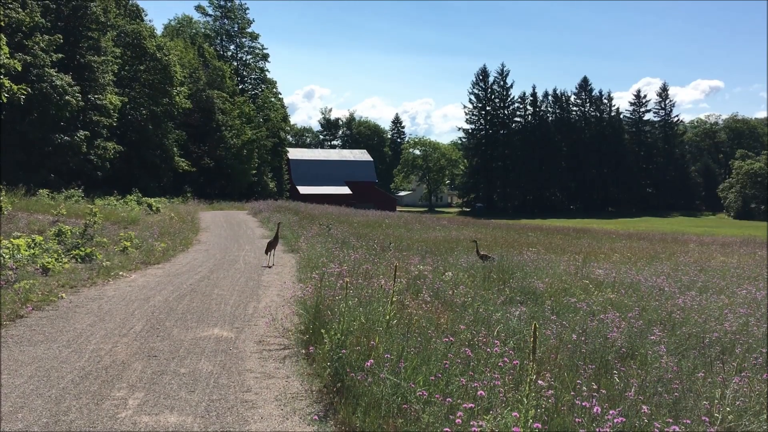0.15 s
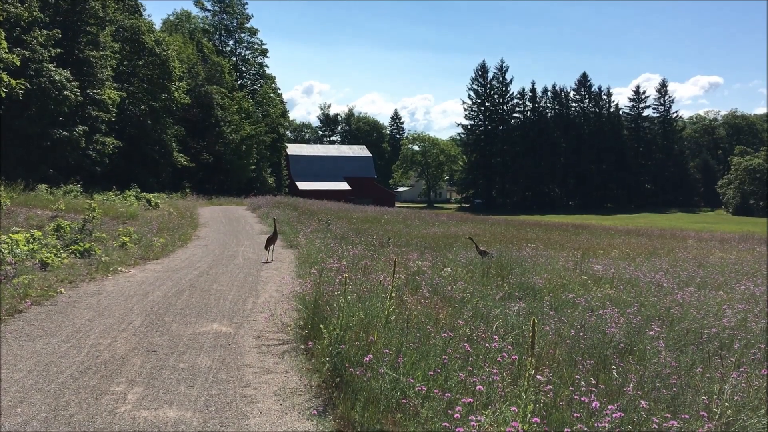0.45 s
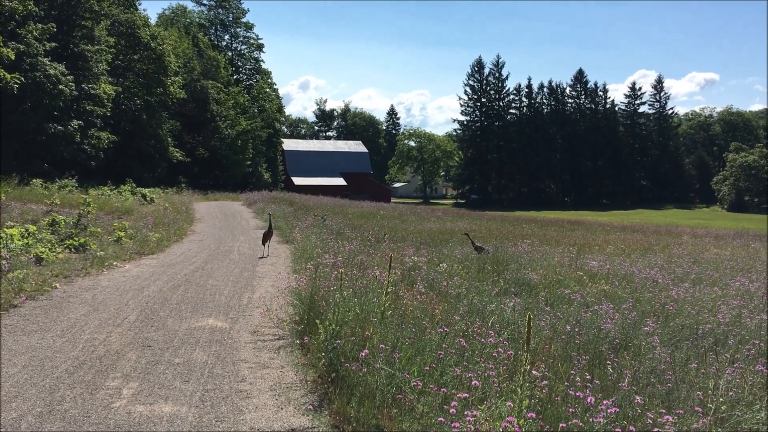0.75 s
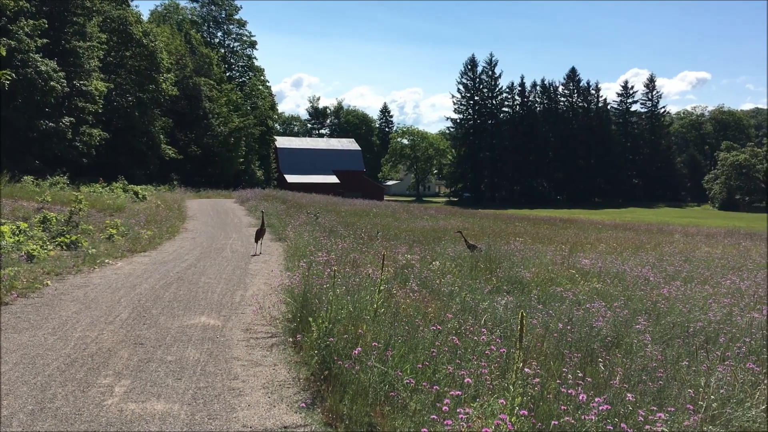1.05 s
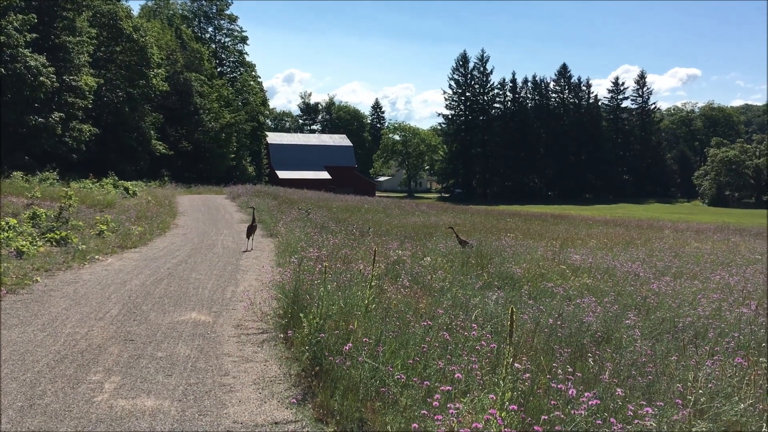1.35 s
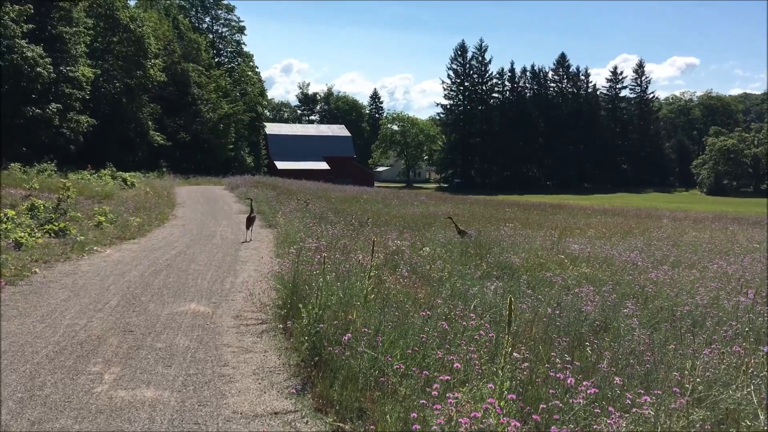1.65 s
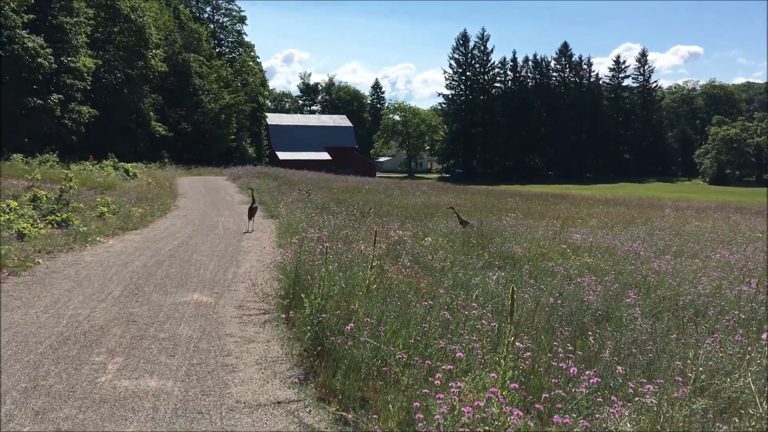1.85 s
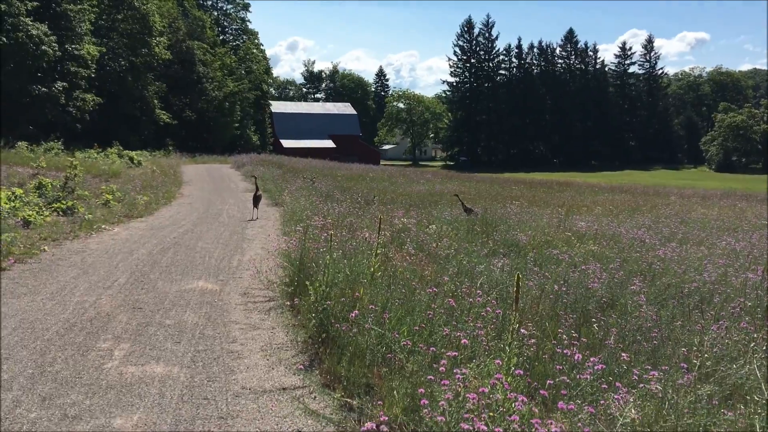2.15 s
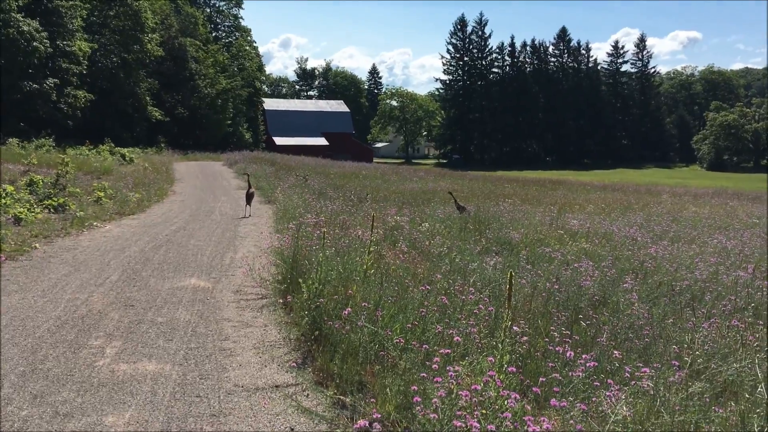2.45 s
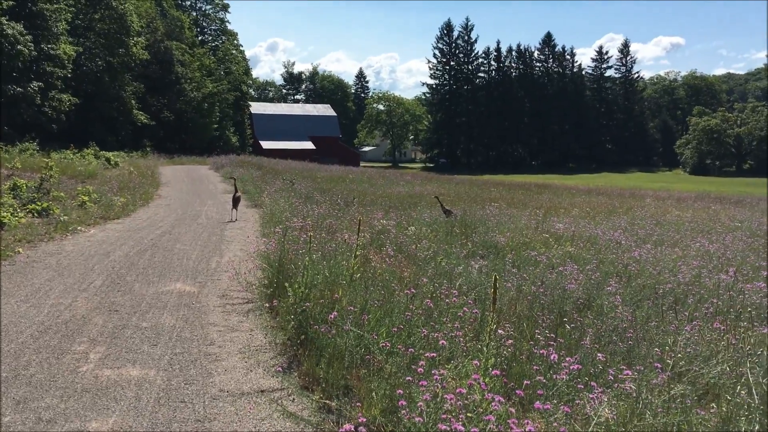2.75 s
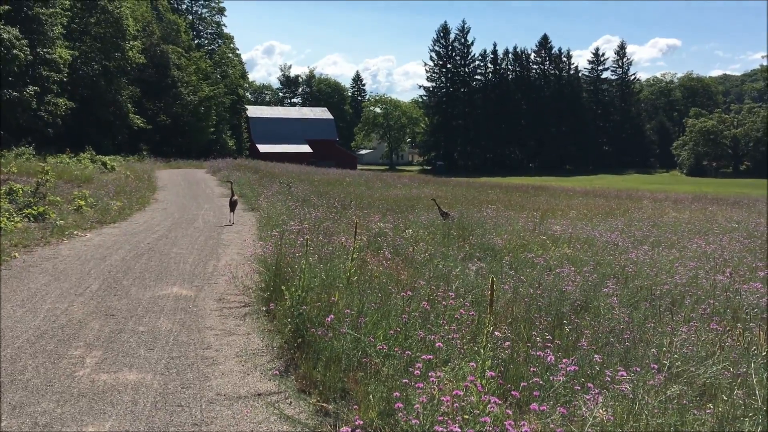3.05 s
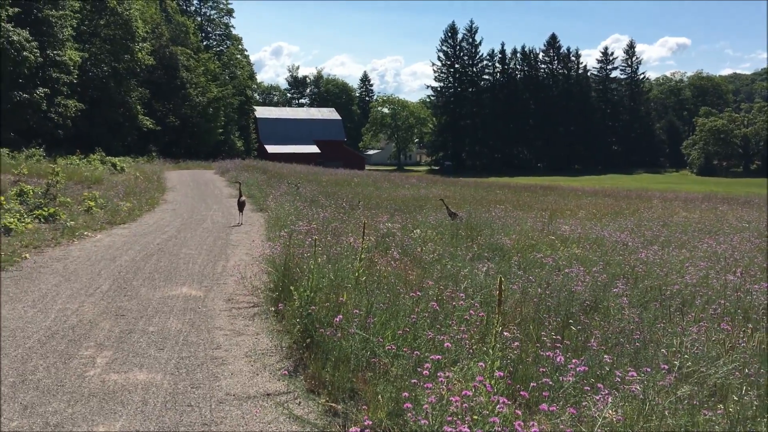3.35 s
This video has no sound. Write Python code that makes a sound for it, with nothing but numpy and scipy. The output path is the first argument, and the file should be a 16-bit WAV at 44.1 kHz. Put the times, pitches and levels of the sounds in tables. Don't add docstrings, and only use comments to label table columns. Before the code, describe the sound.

Loud crane rattles outdoors: each bird gives a short rising croak then a hard, throaty, ringing trill, low bird first, high bird overlapping in answer, repeated once, over wind rumble and faint leaf hiss, mono.

```python
import sys
import numpy as np
from scipy import signal
from scipy.fft import rfft, irfft
from scipy.io import wavfile
from scipy.ndimage import uniform_filter1d

SR = 44100
rng = np.random.default_rng(int(sys.argv[2]) if len(sys.argv) > 2 else 0)


def generate_wav(signal):
    frames = np.transpose(np.atleast_2d(signal))
    scaled = np.clip(frames, -1, 1) * 32767
    pcm = np.round(scaled).astype(np.int16)
    wavfile.write(sys.argv[1], SR, pcm)


def makeup_ratio(level_db):
    decades = np.asarray(level_db, float) / 20
    return 10 ** decades


N = 154350


def evened(x):
    return x / np.sqrt(np.mean(x ** 2) + 1e-20)


def read(points, hz):
    f, value = np.transpose(points)
    return np.interp(np.log(hz + 1), np.log(f + 1), value)


def add(mix, s, sound):
    part = mix[round(s * SR):][:len(sound)]
    part += sound[:len(part)]


def coloured(db_of_hz):
    hz = np.fft.rfftfreq(N, 1 / SR)
    return evened(irfft(rfft(rng.standard_normal(N)) * makeup_ratio(db_of_hz(hz)), N))


def drift(hz):
    return coloured(lambda f: -12 * (f / hz) ** 2)


def air():
    # frequency in Hz, hiss level in dB per Hz.
    leaf_colour = [(180, -35.5), (300, -8.5), (577, -10.5), (907, -1), (1190, -3), (3240, -17), (4930, -23),
                   (15200, -36), (16500, -44.5)]
    # centre in seconds, spread in seconds, level in dB.
    rustles = [
        (1.61, 0.014, -70),
        (3.495, 0.012, -66.5),
    ]
    t = np.arange(N) / SR

    def leaf_db(hz):
        below_300_hz = np.log2(np.maximum(300 / (hz + 1), 1))
        return read(leaf_colour, hz) - 12 * below_300_hz

    hiss = makeup_ratio(-60 + 1.1 * drift(2.4)) * coloured(leaf_db)
    stir = sum(makeup_ratio(db) * np.exp(-((t - s) / spread_s) ** 2) for s, spread_s, db in rustles)
    return hiss + stir * coloured(lambda hz: -2.5 * abs(np.log2((hz + 1) / 3000)))


def wind():
    # time in seconds, wind level in dB.
    gust = [
        (0.0, -47),
        (0.39, -50.5),
        (0.8, -55),
        (1.11, -50),
        (1.29, -43.5),
        (1.94, -41.5),
        (2.3, -53),
        (2.77, -56),
        (3.21, -56),
        (3.5, -59),
    ]
    # time in seconds, peak level in dB.
    buffets = [(0.032, -40.0), (0.111, -51), (0.179, -54), (0.278, -52), (0.323, -50), (0.431, -42),
               (0.518, -30.5), (0.739, -41.5), (0.85, -50.5), (1.13, -29), (1.232, -38.5), (1.303, -33.5),
               (1.419, -28.5), (1.559, -29), (1.692, -38.5), (1.783, -31.5), (1.827, -35), (1.937, -32.5),
               (2.05, -28), (2.122, -33.5), (2.249, -32), (2.541, -47), (2.586, -44), (2.643, -40),
               (2.862, -35.5), (3.021, -39), (3.107, -45.5), (3.387, -49), (3.461, -38.0)]
    # frequency in Hz, rumble level in dB per Hz.
    rumble_colour = [(12, -45), (20, -16), (45, -1.5), (86, 1), (179, -11), (297, -25.5), (415, -38.5),
                     (480, -48), (620, -76.5), (1060, -120)]
    buffet_s, buffet_db = 0.021, -3.5
    gust_db, lump_db = -1.5, 3.5
    bite_db, bite_power = -26, 1.35
    t = np.arange(N) / SR

    level = makeup_ratio(np.interp(t, *np.transpose(gust)) + gust_db + lump_db * drift(16))
    level = level + sum(makeup_ratio(db + buffet_db) * np.exp(-((t - s) / buffet_s) ** 2) for s, db in buffets)
    rumble = coloured(lambda hz: read(rumble_colour, hz))
    rumble = evened(rumble / np.sqrt(uniform_filter1d(rumble ** 2, size=1800) + 0.18))
    bite = coloured(lambda hz: -25 * np.log2((hz + 1) / 270) ** 2) * makeup_ratio(bite_db + 5.1 * drift(36))
    return level * (rumble + bite * (level / makeup_ratio(-33)) ** (bite_power - 1))


def meadow(birds):
    # frequency in Hz, time in seconds for the tail to fall 60 dB.
    tail_t60 = [(300, 0.46), (1000, 1), (2500, 0.95), (6000, 0.61), (14000, 0.53)]
    tail_tilt_db, near_t60_s = 3, .07
    echo_hz, echo_s, echo_spread_s = 1136, .98, 0.053
    turn_from_s, turn_to_s, turn_db = 1.8, 2.29, 3.5
    t = np.arange(int(1.6 * SR)) / SR

    hz, frame_s, z = signal.stft(rng.standard_normal(len(t)), SR, nperseg=256)
    tilt_db = tail_tilt_db * np.log2(hz / 1000 + 0.26)[:, None]
    decay_db = -60 * frame_s / read(tail_t60, hz)[:, None]
    tail = signal.istft(z * makeup_ratio(tilt_db + decay_db), SR, nperseg=256)[1][:len(t)]
    tail = tail * np.minimum(t / 0.025, 1)

    near = rng.standard_normal(len(t)) * makeup_ratio(-60 * t / near_t60_s) * (t > .003)

    echo = signal.lfilter(*signal.iirpeak(echo_hz, 7.0, SR), rng.standard_normal(len(t)))
    echo = echo * np.exp(-((t - echo_s) / echo_spread_s) ** 2)

    parts = [(tail, -6), (near, -13), (echo, -42)]
    response = sum(makeup_ratio(db) * part / np.linalg.norm(part) for part, db in parts)
    now = np.arange(N) / SR
    facing = makeup_ratio(turn_db * ((now > turn_from_s) & (now < turn_to_s)))
    return birds + signal.fftconvolve(birds * facing, response)[:N]


def voiced(hz, pipe, extra_db, rasp, scatter=0):
    turns = np.cumsum(hz) / SR
    k = np.arange(1, len(extra_db) + 1)[:, None]
    rough = uniform_filter1d(rng.standard_normal((len(k), len(hz), 2)), size=24, axis=1)
    rough = rough * np.sqrt(24 * k * hz / 800)[..., None]
    rough = 1 + rasp * (rough[..., 0] + 1j * rough[..., 1])
    phase = 2 * np.pi * k * turns + 0.59 * np.log(k) ** 2 + scatter
    waves = rough * np.exp(1j * phase)
    level = makeup_ratio(read(pipe, k * hz) + extra_db) * (k * hz < 17000)
    return -(level * waves.real).sum(0)


def croaks(rows, throat):
    glide, jitter, rasp = .17, .016, 0.14
    swell_db, peak_at, break_db = -11.5, .65, -28
    effort_tilt_db = 6
    out, t = np.zeros(N), np.arange(3400) / SR
    line = np.arange(1, 85)[:, None]
    between = line % 3 > 0
    for s, length_s, db, hz, third_db in rows:
        u = t / length_s
        off_peak = abs(u / peak_at - 1)
        lines_db = between * (third_db + break_db * np.clip(1 - u / .5, 0, 1))
        lines_db = lines_db + effort_tilt_db * (.25 - off_peak) * np.log2(np.maximum(line / 12, 1))
        edges = np.clip(np.minimum(t, length_s - t) / .002, 0, 1)
        env = makeup_ratio(swell_db * off_peak ** 1.9) * edges
        pitch = hz * (1 - glide * (1 - u) ** 2) / 3
        pitch = pitch * (1 + jitter * u * evened(uniform_filter1d(rng.standard_normal(len(t)), size=250)))
        scatter = between * 2 * np.pi * rng.random(between.shape)
        note = evened(voiced(pitch, throat, lines_db, rasp, scatter))
        add(out, s, makeup_ratio(db) * env * note)
    return out


def rattle(rattles, pitches, pipe, ring, shape):
    rise_s, hold_s, fall_s, gap_s, after_share, sag = shape
    out, t = np.zeros(N), np.arange(800) / SR
    env = np.sin(np.pi / 2 * np.minimum(t / rise_s, 1)) ** 2
    env = env * np.exp(-np.maximum(t - rise_s - hold_s, 0) / fall_s)
    sagging = 1 + sag * (1 - np.minimum(t / (rise_s + hold_s), 2))
    dull_db = -4 * np.log2(np.arange(1, 23))[:, None]
    for beats, (top_hz, drop_hz, curve) in zip(rattles, pitches):
        first_s = beats[0][0]
        for s, db, after_db in beats:
            hz = top_hz - drop_hz * ((s - first_s) / .4) ** curve
            steps_db = [0, after_db, after_db - 11.5]
            if s == first_s:
                steps_db = [0, after_db + 4, after_db + 4.6]
            for k, step_db in enumerate(steps_db):
                is_after = min(k, 1)
                pitch = hz * after_share ** is_after * sagging
                burst = env * voiced(pitch, pipe, dull_db * is_after, 0.16)
                add(out, s - rise_s / 2 + k * gap_s, makeup_ratio(db + step_db - 5) * burst)
    ringing = sum(makeup_ratio(db) * signal.lfilter(*signal.iirpeak(hz, hz / width_hz, SR), out)
                  for hz, width_hz, db in ring)
    return out + ringing


def low_crane():
    # beat time in seconds, peak level in dB, after-beat level in dB.
    rattles = [
        [(0.216, -14, -17), (0.277, -16, -9.5), (0.333, -18.5, -7), (0.388, -19, -11), (0.434, -19.5, -4),
         (0.481, -21, -8), (0.524, -23.5, -2), (0.565, -27, -12)],
        [(2.008, -13, -15), (2.07, -15, -16), (2.125, -14.5, -11.5), (2.174, -15, -12), (2.22, -15, -12.5),
         (2.266, -17.5, -11), (2.309, -19.5, -11)],
    ]
    # top pitch in Hz, drop in Hz over 0.4 s, curve of the fall.
    pitches = [
        (840, 106, 1.9),
        (861, 156, 2.25),
    ]
    # frequency in Hz, level in dB.
    pipe = [(400, -8), (820, 2), (1700, -3), (2550, -22.5), (3400, -16), (4250, -8), (6500, -23.5),
            (14000, -35)]
    # frequency in Hz, width in Hz, level in dB.
    ring = [(747, 80, -4), (1570, 95, -11.5), (3360, 140, -6)]
    # rise, hold, fall, after-beat gap in seconds, after-beat pitch and sag as shares of pitch.
    beat = (.003, 0.0032, 0.0027, .0105, 0.91, 0.034)
    # start in seconds, length in seconds, level in dB, pitch in Hz, third-period lines in dB.
    croak_rows = [
        (.073, .068, -28.5, 535, -7),
        (1.864, .07, -31, 534.5, -2),
    ]
    # frequency in Hz, level in dB.
    throat = [(350, -15), (560, 3), (1000, -2), (1650, -1), (2100, -5), (2800, -19.5), (4500, -11),
              (14000, -30)]
    return rattle(rattles, pitches, pipe, ring, beat) + croaks(croak_rows, throat)


def high_crane():
    # beat time in seconds, peak level in dB, after-beat level in dB.
    rattles = [
        [(0.4489, -12.5, -5), (0.5262, -12.5, -4.5), (0.5926, -11, -5.5), (0.6509, -12, -6.5),
         (0.7048, -12, -7), (0.7552, -12.5, -6), (0.8026, -14.5, -4), (0.846, -21, -4.5)],
        [(2.4319, -12.5, -5.5), (2.5122, -11, -4.5), (2.5765, -10.5, -7), (2.6329, -12, -4.5),
         (2.6873, -13.5, -8), (2.7387, -12, -8), (2.7856, -15.5, -4), (2.828, -21.5, -6)],
    ]
    # top pitch in Hz, drop in Hz over 0.4 s, curve of the fall.
    pitches = [
        (1158.3, 317, 4.14),
        (1173.6, 336, 3.72),
    ]
    # frequency in Hz, level in dB.
    pipe = [(500, -13), (1150, 1), (2240, -9), (2900, -26), (3500, -14.5), (5800, -15), (8000, -29),
            (14000, -45)]
    # frequency in Hz, width in Hz, level in dB.
    ring = [(897, 115, -4), (1903, 140, -5.5), (3390, 130, -11)]
    # rise, hold, fall, after-beat gap in seconds, after-beat pitch and sag as shares of pitch.
    beat = (.0017, 0.0022, 0.0023, .0088, .8, 0.05)
    # start in seconds, length in seconds, level in dB, pitch in Hz, third-period lines in dB.
    croak_rows = [
        (.309, .07, -29, 637.3, -3),
        (2.297, .069, -29.5, 634, -3),
    ]
    # frequency in Hz, level in dB.
    throat = [(450, -21.5), (800, 2), (1300, 2), (2000, -0.5), (2600, -20), (4500, -13), (8000, -31),
              (14000, -50)]
    voice = rattle(rattles, pitches, pipe, ring, beat) + croaks(croak_rows, throat)
    return signal.sosfilt(signal.butter(2, 680, "high", fs=SR, output="sos"), voice)


def scene():
    floor = signal.butter(2, 339, "high", fs=SR, output="sos")
    birds = signal.sosfilt(np.r_[floor, floor], low_crane() + high_crane())
    return (meadow(birds) + wind() + air())[None]


def low_pass(x):
    return signal.sosfilt(signal.butter(12, 16660, fs=SR, output="sos"), x)


def record(dry):
    edge = signal.firwin(255, 15900, window=("kaiser", 7), fs=SR)[None]
    mix = signal.oaconvolve(dry, edge, "same")
    return low_pass(mix)


dry = scene()
out = record(dry)
generate_wav(out)
```